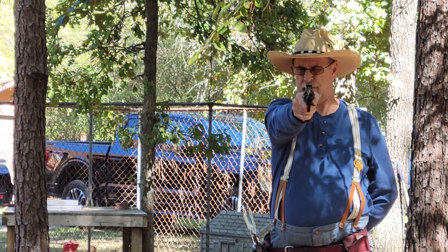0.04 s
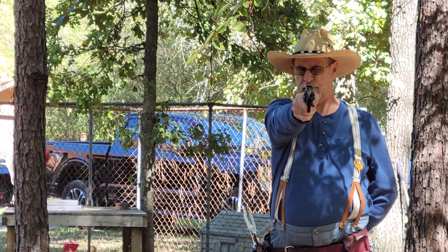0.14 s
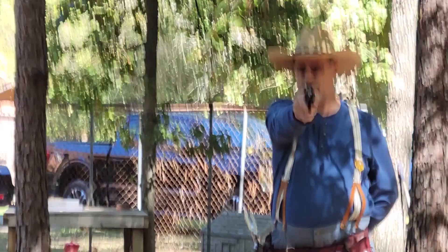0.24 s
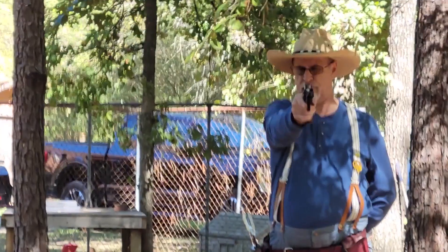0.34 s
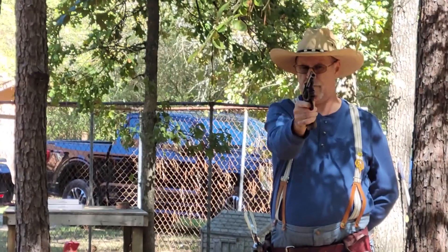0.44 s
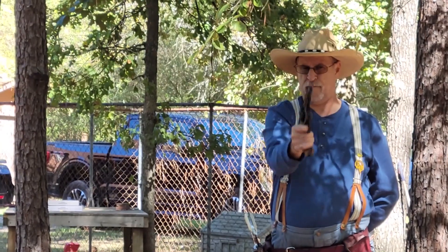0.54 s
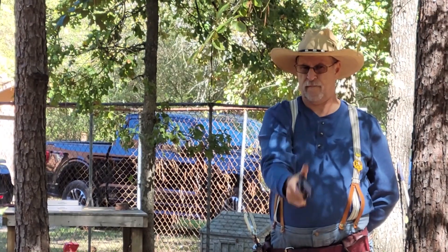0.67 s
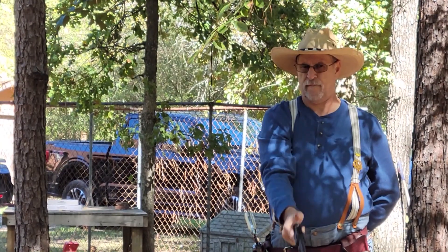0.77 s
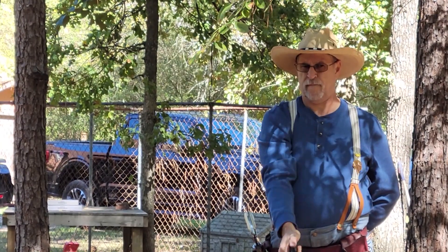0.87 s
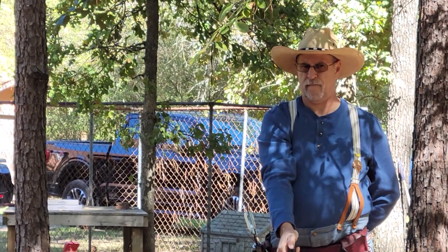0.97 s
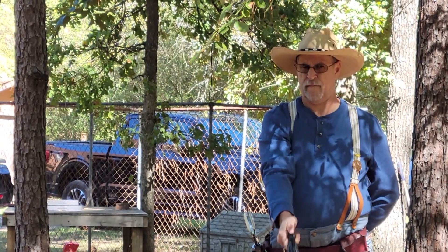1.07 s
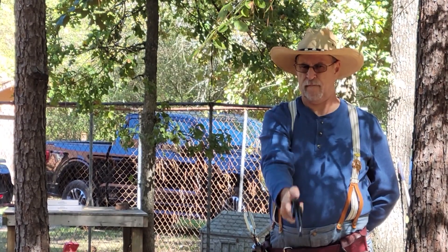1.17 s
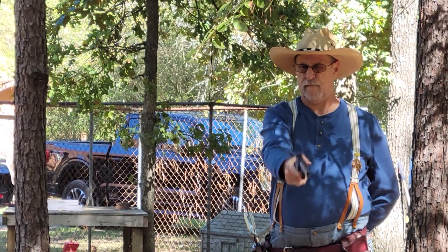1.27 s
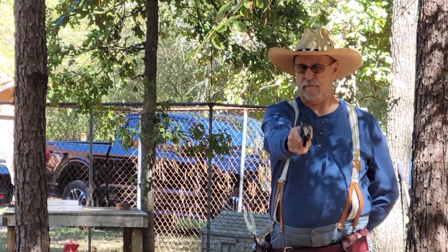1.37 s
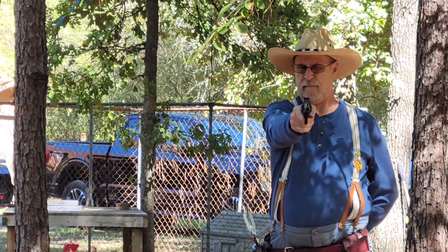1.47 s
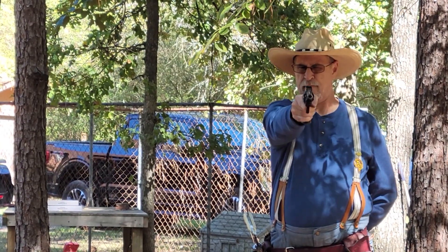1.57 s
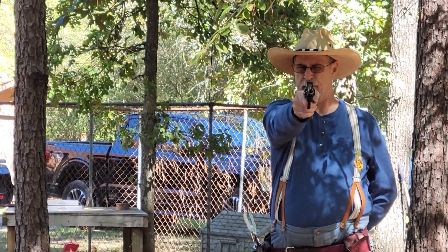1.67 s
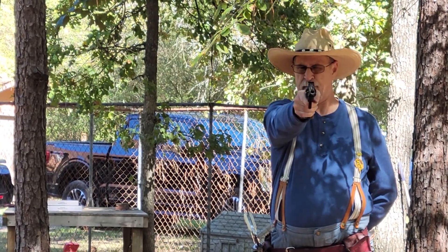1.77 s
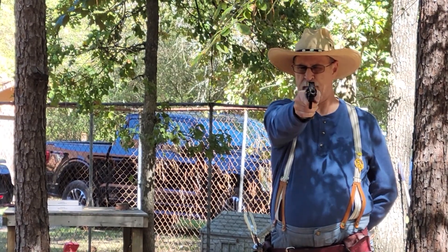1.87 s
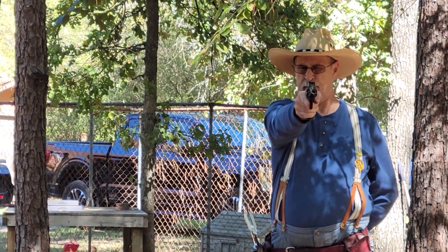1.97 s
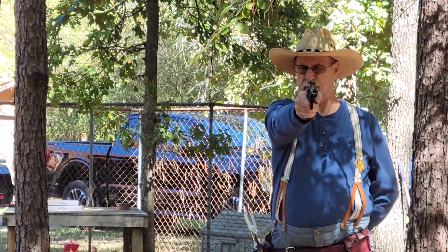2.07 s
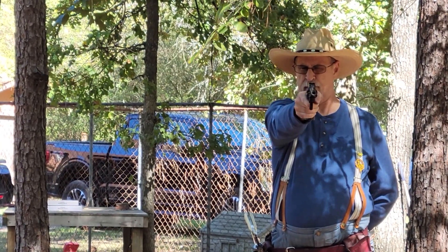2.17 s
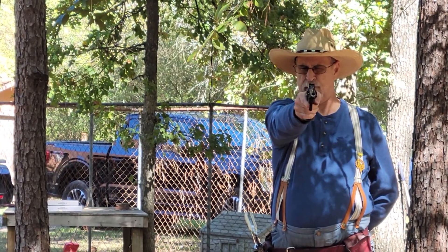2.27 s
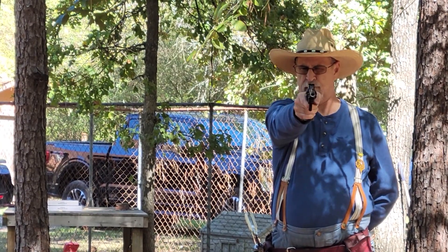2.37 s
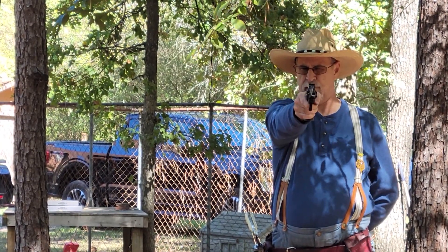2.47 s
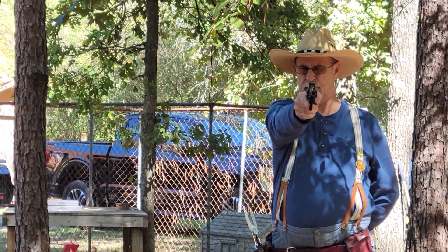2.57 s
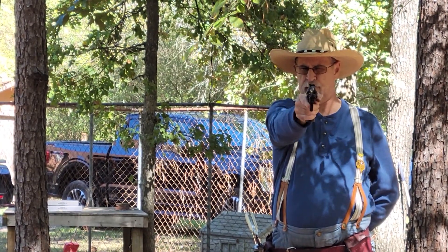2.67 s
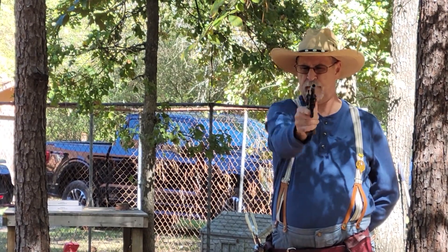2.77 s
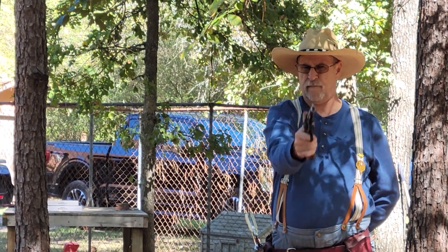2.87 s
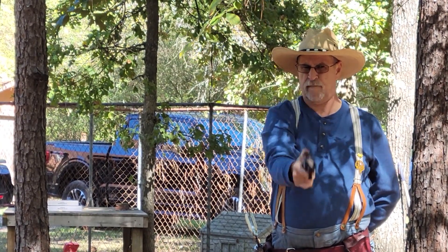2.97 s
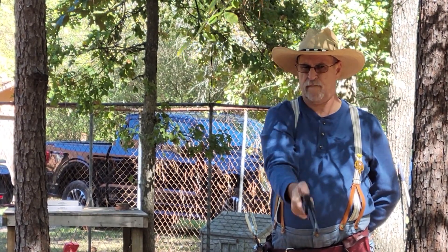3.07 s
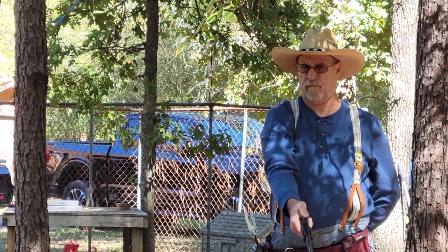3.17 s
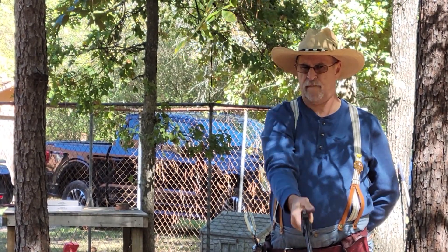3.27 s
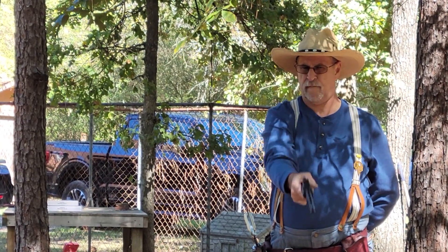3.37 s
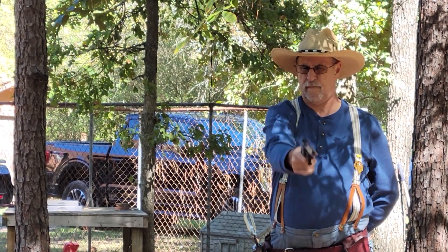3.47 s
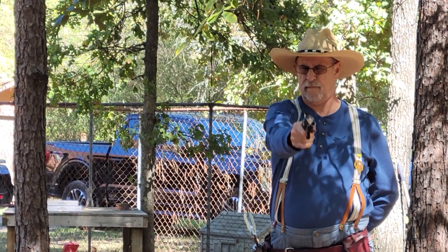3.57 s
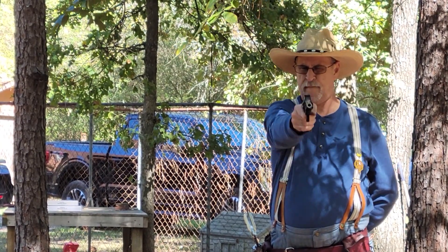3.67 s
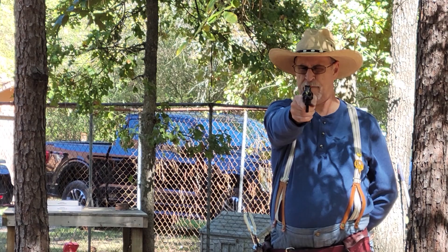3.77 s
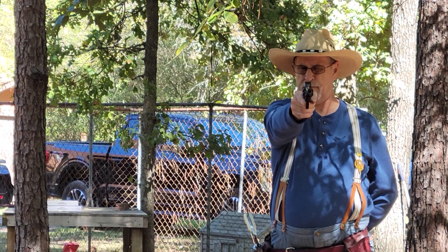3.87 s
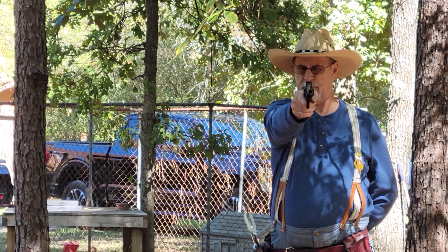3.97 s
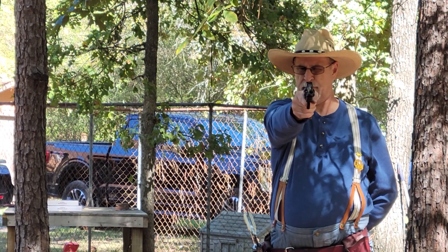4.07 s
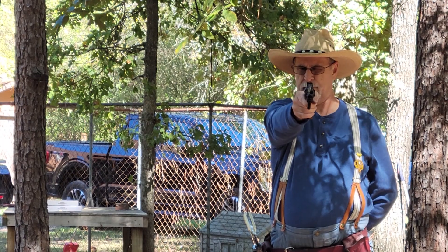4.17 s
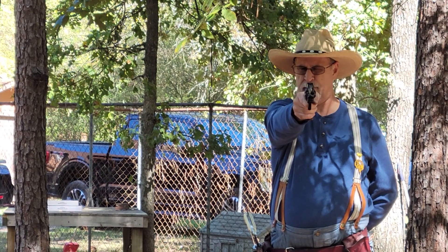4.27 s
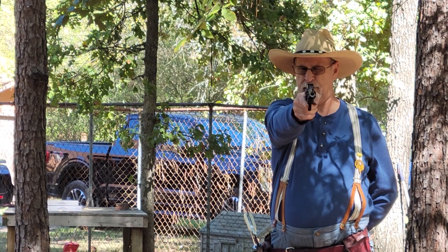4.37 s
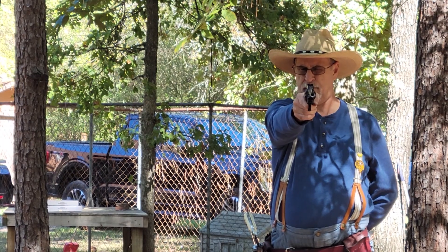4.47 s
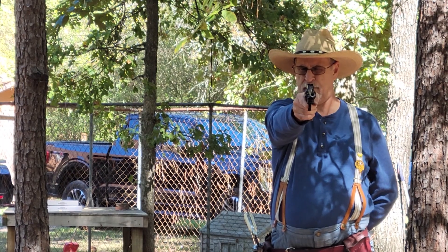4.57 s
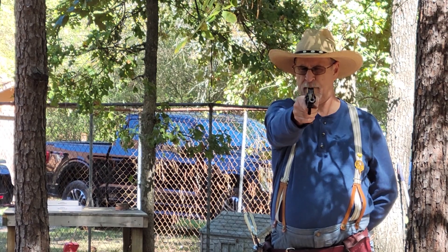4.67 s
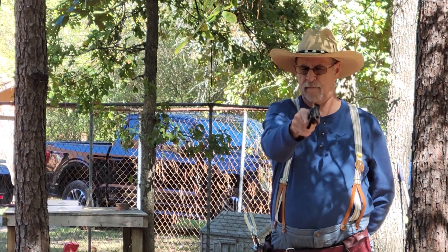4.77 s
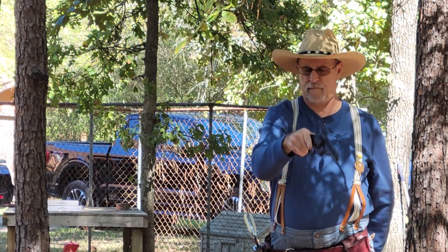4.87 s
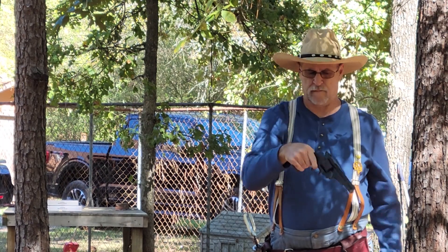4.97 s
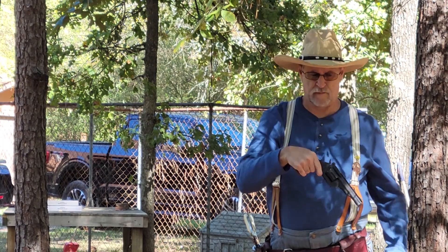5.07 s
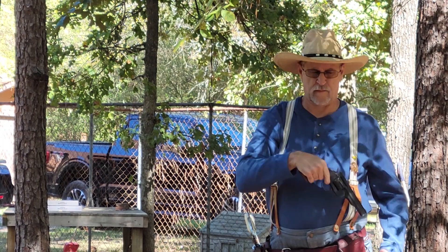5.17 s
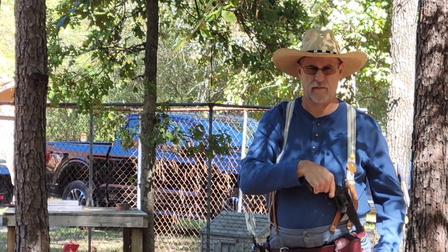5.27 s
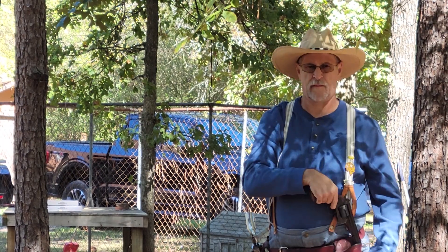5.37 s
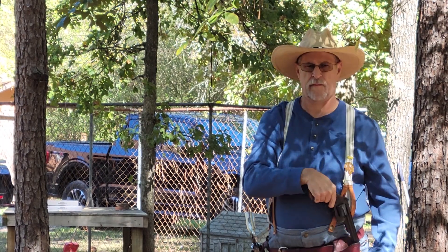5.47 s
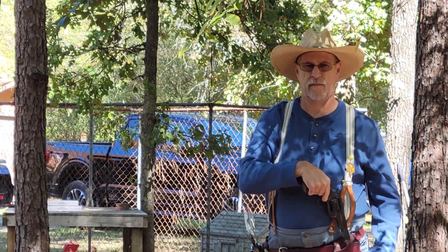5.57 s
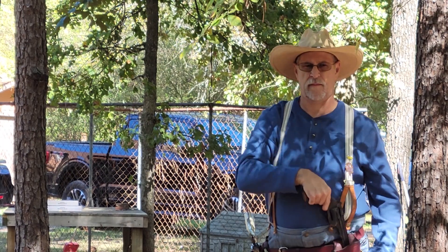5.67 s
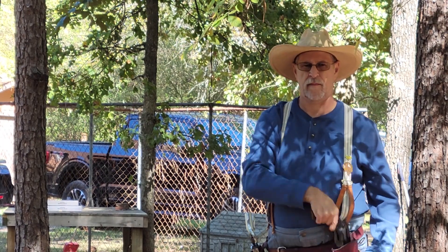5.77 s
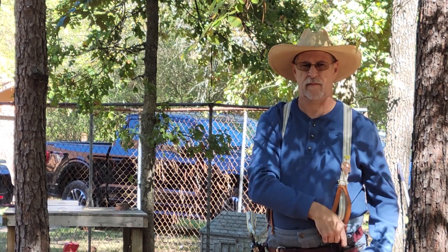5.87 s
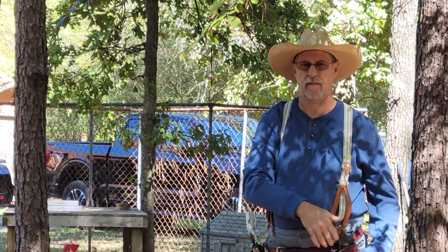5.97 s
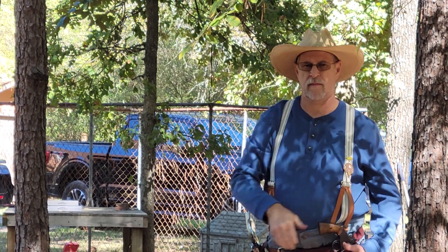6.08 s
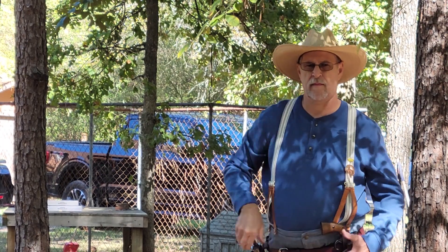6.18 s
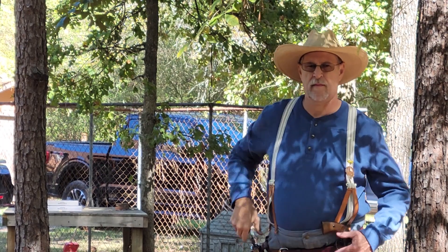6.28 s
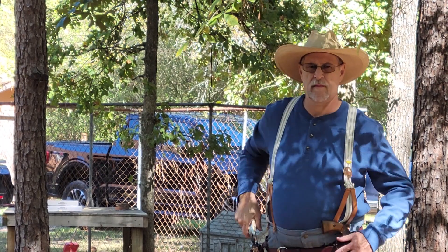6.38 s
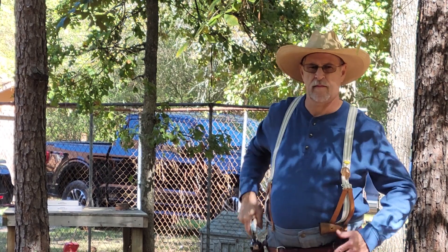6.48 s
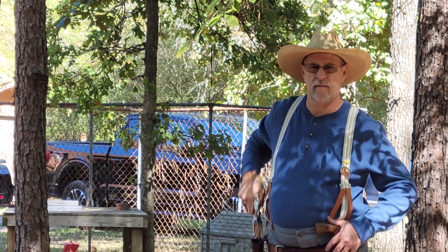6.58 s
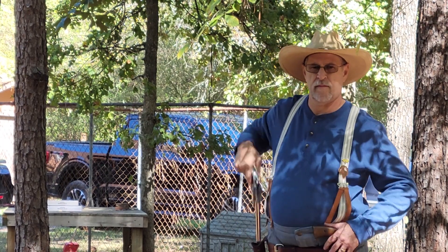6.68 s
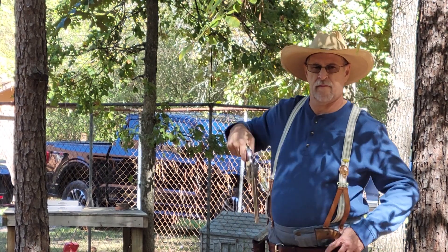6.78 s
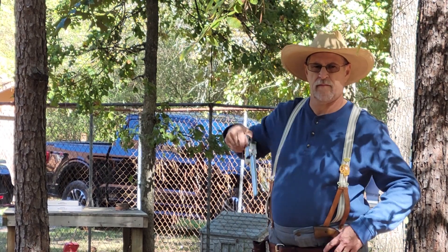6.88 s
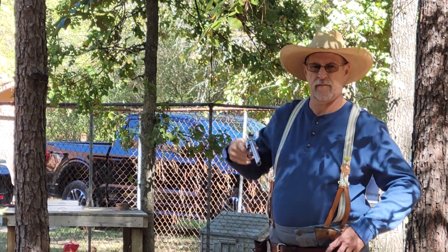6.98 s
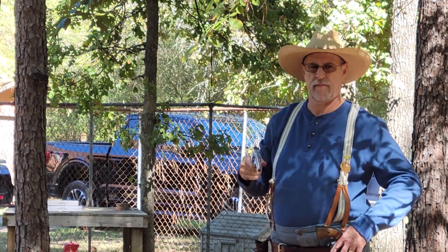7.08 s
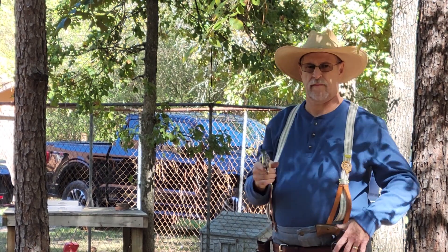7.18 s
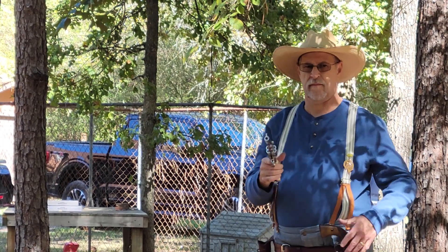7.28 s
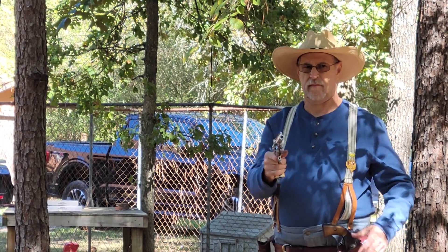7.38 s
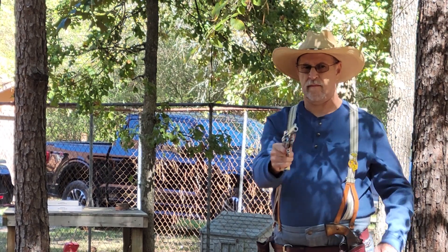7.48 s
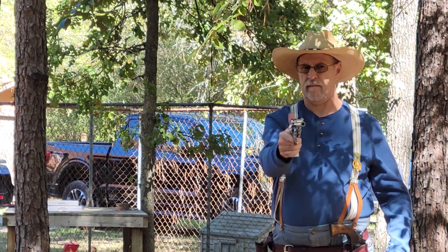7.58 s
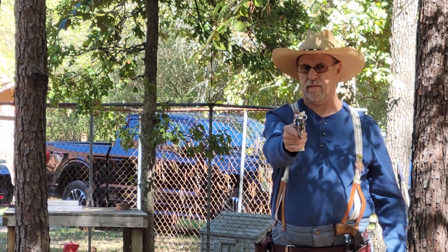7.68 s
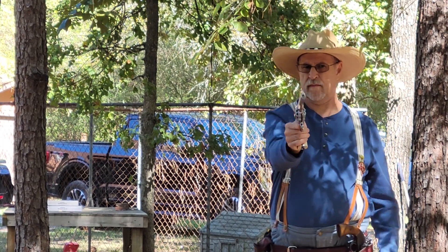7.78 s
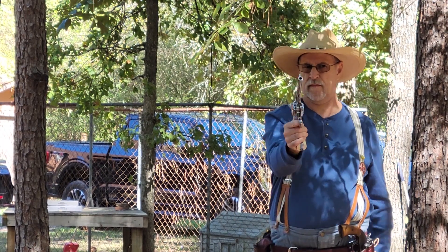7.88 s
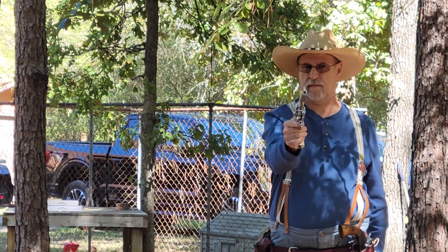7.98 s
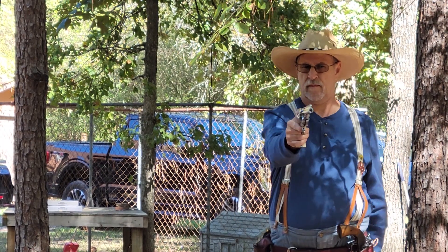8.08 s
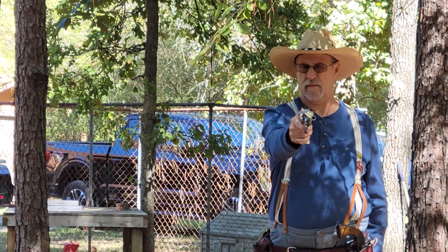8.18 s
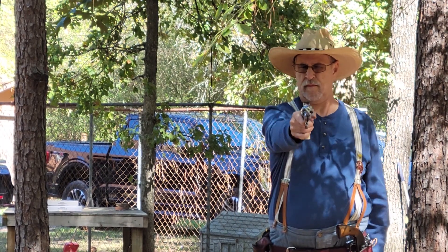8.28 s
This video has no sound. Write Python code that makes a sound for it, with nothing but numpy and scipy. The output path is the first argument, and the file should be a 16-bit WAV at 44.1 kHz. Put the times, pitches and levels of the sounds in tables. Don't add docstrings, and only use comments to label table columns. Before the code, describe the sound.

Three sharp gas revolver cracks outdoors, each followed instantly by a pellet ringing a nearby steel plate, with hammer clicks over faint traffic rumble.

```python
import sys
import numpy as np
from scipy import signal
from scipy.io import wavfile
from scipy.ndimage import uniform_filter1d, minimum_filter1d

SR = 44100
rng = np.random.default_rng(int(sys.argv[2]) if len(sys.argv) > 2 else 0)


def digitize_waveform(pressure):
    field = np.atleast_2d(pressure).T
    bounded = np.clip(field, -1, 1)
    quanta = np.round(bounded * 32767).astype(np.int16)
    wavfile.write(sys.argv[1], SR, quanta)


def volts_from_decibels(level):
    exponent = np.asarray(level, float) / 20
    return 10 ** exponent


N = 367794

# shot in seconds, pellet strike in seconds.
TIMES = [
    (.1175, .1600),
    (2.4107, 2.4576),
    (4.4400, 4.4885),
]
# shot in dB, strike clatter in dB, ducking at the shot in dB, at the strike in dB.
SHOTS = [
    (16, -11, 26, 10),
    (16, -11, 22.5, 12.5),
    (16, -4, 23.5, 13.5),
]
# frequency in Hz, level in dB per Hz.
WOODS = [(290, -46.5), (500, -15), (1080, -8), (3390, -8.5), (4870, -1), (5880, -8.5), (6610, 0),
         (9220, -11), (13300, -11), (16000, -14)]
# frequency in Hz, level in dB per Hz.
LATCH = [(1060, -38), (1800, -3.5), (2970, -20.5), (3200, -6.5), (4720, -10.5), (7300, -5), (9370, -29),
         (14500, -18.5), (16500, -36.5)]
REBOUND_S, REBOUND_DB, REBOUND_DUCK_DB = .189, -17.5, 10.6


def evened(x):
    return x / np.sqrt(np.mean(x ** 2) + 1e-20)


def read(points, hz):
    f, value = np.transpose(points)
    return np.interp(np.log(hz + 1), np.log(f + 1), value)


def add(mix, s, sound):
    part = mix[:, round(s * SR):][:, :sound.shape[1]]
    part += sound[:, :part.shape[1]]


def coloured(x, points):
    gain_db = np.maximum(read(points, abs(np.fft.fftfreq(2048, 1 / SR))), -80)
    gain = np.log(volts_from_decibels(gain_db))
    taps = np.fft.ifft(np.exp(gain - 1j * signal.hilbert(gain).imag)).real[:1024]
    return signal.fftconvolve(x, taps[None] / np.linalg.norm(taps), axes=1)[:, :x.shape[1]]


def pair(length, same):
    a, b = rng.standard_normal((2, length))
    same = np.clip(same, 0, 1)
    return np.array([a, same * a + np.sqrt(1 - same ** 2) * b])


def blotches(shape, bins, frames):
    patches = uniform_filter1d(rng.standard_normal(shape), size=bins, axis=0)
    return evened(uniform_filter1d(patches, size=frames, axis=1))


def burst(ms, same):
    t = np.arange(6000) / SR
    x = pair(len(t), same) * np.exp(-t * 1000 / ms) * np.minimum(t * 9000, 1)
    return 2 * x / abs(x).max()


def tail(points, stretch):
    # frequency in Hz, time to fall by 60 dB in seconds.
    woods_t60 = [(200, 0.57), (1000, 0.33), (3000, 0.33), (7500, 0.32), (9000, 0.26), (16000, 0.21)]
    hz, t, z = signal.stft(pair(SR * 2 // 3, 0.58), SR, nperseg=256)
    patches = blotches(z.shape[1:], 2, 14)
    z = z * volts_from_decibels(4.84 * patches - 60 * t / (stretch * read(woods_t60, hz)[:, None]))
    return coloured(signal.istft(z, SR, nperseg=256)[1], points)


def hiss_swell(length_s):
    count = round(length_s * SR)
    return np.hanning(count) * evened(coloured(pair(count, .3), LATCH))


def yard():
    # frequency in Hz, level in dB per Hz.
    yard_colour = [(20, -38), (33, -30), (55, -13.5), (96, -6), (195, -24.5), (330, -29), (500, -27),
                   (640, -37.5), (1180, -38.5), (2500, -52.5), (4530, -70.5), (6000, -67), (7400, -59),
                   (8400, -100), (16500, -100)]
    # time in seconds, level in dB.
    rumble = [(0.0, -40.5), (0.32, -35.5), (1.79, -46.5), (2.74, -40), (4.02, -46), (4.92, -38),
              (5.34, -45.5), (8.18, -43), (8.34, -42.5)]
    # frequency in Hz, likeness from 0 to 1.
    likeness = [(30, .9), (100, .93), (200, .91), (400, .8), (1000, .6), (3000, .3), (8000, .2)]
    level_db, throb_db, slowest_hz, fastest_hz = -41, 1.64, .8, 9
    frames, hz = N // 512 + 6, np.fft.rfftfreq(2048, 1 / SR)
    a, b, c, d = rng.standard_normal((frames, 1025, 4)).T
    patches = blotches((1025, frames), 30, 25)
    t = np.arange(frames) * 512 / SR
    throb = 0
    for f in np.geomspace(slowest_hz, fastest_hz, num=24):
        throb = throb + np.sin(2 * np.pi * (f * t + rng.random())) / np.sqrt(f)
    swell_db = np.interp(t, *np.transpose(rumble)) + throb_db * evened(throb)
    low = 1 / (1 + (hz / 250) ** 2)
    same = np.clip(read(likeness, hz), 0, 1)[:, None]
    left = a + 1j * b
    right = 1.08 * (same * left + np.sqrt(1 - same ** 2) * (c + 1j * d))
    z = np.array([left, right])
    z *= volts_from_decibels(read(yard_colour, hz)[:, None] + 0.52 * patches + low[:, None] * (swell_db - swell_db.mean()))
    return volts_from_decibels(level_db) * evened(signal.istft(z, nperseg=2048, noverlap=1536)[1][:, :N])


def steel():
    # frequency in Hz, time to fall by 60 dB in seconds, level in dB after
    plate = [(467.0, 23.99, -32.5, -19.7, -19.2), (1045.0, 8.54, -52.4, -59.5, -42.6),
             (1172.9, 12.06, -37.1, -54.0, -39.2), (1480.1, 5.96, -26.9, -60.1, -43.1),
             (2740.7, 1.39, -13.9, -42.2, -19.2), (3078.8, 0.33, -31.4, -37.2, -17.4),
             (3169.8, 1.18, -18.3, -30.8, -17.3), (3485.9, 0.75, -1.8, -33.5, -20.8),
             (3869.8, 0.58, -22.7, -12.2, -22.6), (3933.7, 0.36, -14.2, -14.4, -16.6),
             (4266.7, 0.75, -12.2, -36, -38), (4334.1, 0.44, -30.4, -8.7, -9.3),
             (4712.1, 0.41, -17.9, -35.5, -13.1), (5425.4, 0.52, -29.9, -25.3, -9.1),
             (5808.6, 0.32, -17.7, -33.5, -25.3), (6108.6, 0.52, -19.1, -36.9, -22.0),
           (6573.1, 0.57, -34.2, -17.0, -19.3), (7428.6, 0.49, -27.1, -9.5, -14.5),
           (7589.3, 0.53, -24.9, -35.7, -21.4), (10529.4, 0.37, -18.3, -42.5, -16.4),
           (10813.4, 0.42, -24.0, -40.7, -13.6), (11669.6, 0.39, -18.0, -22.0, -27.4),
           (11692.0, 0.3, -10.9, -3.9, -9.8), (11957.0, 0.35, -27.9, -8.9, -8.3),
           (12205.0, 0.45, -18.2, -30.3, -32.0), (13285.3, 0.29, -25.7, -33.8, -16.4),
           (13789.1, 0.24, -9.3, -21.6, -9.6), (13911.7, 0.19, -5.6, -37.4, -2.5),
             (14918.3, 0.4, -15.3, -62.7, -18.9), (832.1, 1.44, -55.0, -33.5, -33.1),
              (1371.7, 0.95, -52.4, -45.1, -45.2), (1990.8, 1.33, -31.9, -44.8, -34.4),
              (2082.2, 0.59, -29.0, -53.4, -49.9), (2799.3, 0.96, -35.7, -41.8, -26.9),
              (3819.8, 0.74, -26.4, -43.7, -40.2), (5213.1, 0.46, -38.1, -36.2, -30.9),
              (6203.5, 0.52, -22.7, -52.8, -44.9), (6276.6, 0.44, -30.1, -38.0, -30.0),
              (7124.2, 0.47, -35.6, -48.6, -28.3), (9026.3, 0.42, -29.4, -33.3, -20.5),
              (13011.6, 0.37, -23.0, -24.5, -60.6), (15214.8, 0.4, -22.1, -31.8, -34.7)]
    # left minus
    # right in dB, left's lead in radians.
    plate_ports = [(-1.4, -0.3), (5.0, -2.1), (11.6, 2.7), (5.9, -1.0), (5.3, -1.9), (-4.6, -1.8),
                   (5.9, -2.1), (2.4, -2.1), (-0.7, -0.5), (-4.6, -0.3), (-3.3, 1.2), (-4.2, 3.1),
                   (-11.0, 2.1), (-11.9, -2.8),
                   (-11.4, -1.9), (1.1, 3.0), (0.1, 2.2), (-7.9, 0.4), (-11.1, -2.7), (13.9, -0.2),
                 (18.9, -1.5), (0.3, -2.1), (10.5, -1.7), (-13.7, -2.6), (-1.7, -2.6), (2.7, 3.0),
                 (-5.6, -2.1), (16.5, -1.6),
                   (-1.0, 1.3), (-0.7, -1.2), (3.6, -0.6), (4.9, -3.0), (-6.3, -1.2), (-0.1, -1.6),
                    (-13.3, 2.0), (-0.8, 0.7), (5.1, -1.6), (5.7, -0.4), (-3.9, -1.3), (16.8, 2.9),
                    (8.8, 0.9), (18.0, 1.0)]
    # frequency in Hz, left minus right in dB, left's lead in radians.
    frame_places = [(1885, 2, -1.5), (1350, 2, -.6), (2781, 1, -1.6), (4287.9, 4, 3.1), (7773, -4, -.8),
                    (8113, 4, -.7), (8640, 3, 1.2), (9895, 12, -.5), (10900, 6, -1.2), (11300, 3, -.8),
                    (12310, -3, -1.5), (14120, 3, .8), (15720, 5, .6), (11490, 4, -1.3)]
    # time to fall by 60 dB in seconds, level in dB after strike one, two, three.
    frame_blows = [(0.24, -31, -19.5, -16.5), (.2, -34.5, -25, -28.5), (3.2, -50, -52, -45),
                   (1.1, -34.5, -22, -24.5), (.35, -47.5, -26.5, -42.5), (0.28, -19.5, -37, -45.5),
                   (.25, -39, -25, -42.5), (.45, -31.5, -44.5, -34.5), (0.19, -40, -25, -44),
                   (.3, -37, -34, -43.5), (0.25, -32, -14, -37), (.28, -38.5, -23, -42.5),
                   (.4, -36, -42.5, -44.5), (.4, -41, -28, -47)]
    # frequency in Hz, level in dB.
    earlier = [(467, -32), (1045, -49.5), (1172.9, -48.5), (1480.1, -60)]
    extra_db = [0, 5.5, -1, 4]
    shed_s, shed_above_hz = .03, 10000
    out = np.zeros((2, N))
    starts = [0] + [strike for _, strike in TIMES]
    ends = starts[1:] + [N / SR]
    modes = plate + [(place[0], *blow) for place, blow in zip(frame_places, frame_blows)]
    ports = plate_ports + [place[1:] for place in frame_places]
    for (hz, t60, *blows_db), (left_db, lead) in zip(modes, ports):
        before_db = max([db for f, db in earlier if abs(f - hz) < 30], default=-150)
        left = volts_from_decibels(np.clip(left_db, -20, 20))
        for start, end, db, shed_db in zip(starts, ends, [before_db, *blows_db], extra_db):
            t = np.arange(0, min(end - start, (db + 102) * t60 / 60), 1 / SR)
            turn = 2 * np.pi * (hz * t + rng.random())
            sides = np.sqrt(2 / (1 + left ** 2)) * np.array([left * np.sin(turn + lead), np.sin(turn)])
            rise = 1 - (start > 0) * np.exp(-t / (0.013 / (1 + (hz / 6000) ** 4)))
            early_db = shed_db * (hz > shed_above_hz) * np.exp(-t / shed_s)
            add(out, start, volts_from_decibels(db + early_db - 60 * t / t60) * rise * sides)
    return out


def hiss_before_cracks():
    out, t = np.zeros((2, N)), np.arange(-1760, 0) / SR
    swell = volts_from_decibels(-29 + 840 * t) * np.minimum(1, (t - t[0]) / 0.0078)
    for shot, _ in TIMES:
        add(out, shot + t[0], swell * coloured(pair(len(t), .4), WOODS))
    return out


def revolver():
    # delay in seconds, level in dB, length in milliseconds.
    echoes = [
        (0, 2, 1.0),
        (.0018, -7, 1.2),
        (.008, -11, 1.3),
        (.0119, -5, .4),
        (.0137, -10, .5),
        (.019, -21, 1.5),
        (.0238, -13, 1.0),
        (.031, -20, 2.5),
    ]
    # frequency in Hz, level in dB per Hz.
    crack = [(290, -27), (500, -4), (2230, -8.5), (3200, -5.5), (3650, -8), (4470, -2), (7210, -5),
             (9490, -23), (12500, -15), (16000, -24)]
    out, t = np.zeros((2, N)), np.arange(6000) / SR
    front = 2.1 * (np.arange(len(t)) == 6) * np.ones((2, 1))
    push = (1 - t / 0.0009) * np.exp(-t / 0.00089) * np.minimum(t * 1500, 1) * np.ones((2, 1))
    for (shot, strike), (shot_db, clatter_db, _, _) in zip(TIMES, SHOTS):
        for delay, db, ms in echoes:
            snap = coloured(.8 * burst(ms, 0.51) + front / np.sqrt(ms), crack)
            add(out, shot + delay, volts_from_decibels(shot_db + db) * (snap + volts_from_decibels(-27.5) * push))
        add(out, shot + echoes[3][0], volts_from_decibels(shot_db - 18.0) * push)
        add(out, shot + .001, volts_from_decibels(shot_db - 18.5) * tail(WOODS, 0.57))
        add(out, shot + .001, volts_from_decibels(shot_db - 39.5) * tail(WOODS, 1.7))
        add(out, strike, volts_from_decibels(clatter_db) * tail(WOODS, 0.23))
    add(out, REBOUND_S, volts_from_decibels(REBOUND_DB) * coloured(burst(5.6, .5), crack))
    return out


def clicks():
    # time in seconds, peak in dB, pitch in Hz, brightness in dB.
    hammer = [(0.5744, -64, 6110, -20), (0.637, -56, 7200, -5.5), (0.648, -63, 7000, -6),
              (0.6914, -66, 5800, -11), (0.805, -57, 7270, -9), (0.8144, -57, 6000, -11),
              (0.8744, -56, 6110, -17), (1.0088, -30.5, 5630, -10), (2.9966, -38, 7430, -3),
              (3.0705, -39, 5370, -25), (3.077, -28, 6900, -17), (8.1024, -27.5, 7520, -21)]
    # time in seconds, peak in dB, pitch in Hz.
    holster = [(3.2582, -50.5, 4900), (5.33, -66, 4620), (5.8194, -70, 4570), (5.8444, -67, 6350),
               (6.079, -71.5, 4680), (6.3254, -55.5, 7340), (7.01, -54, 6800), (8.0183, -50.5, 6300)]
    # time in seconds, peak in dB, pitch in Hz.
    pings = [
        (2.5112, -25, 5220),
        (2.623, -33, 5420),
    ]
    # time in seconds, peak in dB, pitch in Hz.
    clinks = [(1.007, -38.5, 4300), (6.29, -60.5, 3300), (7.008, -59, 5070), (7.01, -63, 5920),
              (8.102, -46, 3300), (8.103, -44, 5020)]
    hammer_left_db, holster_left_db, holster_bright_db, rattle_ms = -3, -6, -32.5, 5.2
    thud_db, thud_hz, thud_s = -5, 122, 0.012
    halo_db, halo_s = -28.5, .06
    out, t = np.zeros((2, N)), np.arange(6000) / SR
    treble = signal.butter(4, 9200, "high", fs=SR, output="sos")
    parts = [(*row, hammer_left_db) for row in hammer]
    parts += [(*row, holster_bright_db, holster_left_db) for row in holster]
    for s, db, hz, bright_db, left_db in parts:
        ring = 0.39 * np.sin(2 * np.pi * hz * t) * np.exp(-t / 0.0042) * np.minimum(t * 900, 1)
        tick = 0.54 * burst(1.7, 0.79)
        rattle = 0.32 * np.minimum(t * 250, 1) * burst(rattle_ms, 0.3)
        scatter = 0.088 * burst(24, .2) + .03 * burst(55, .2)
        snap = coloured(tick + rattle + scatter, LATCH)
        snap = snap + (volts_from_decibels(bright_db + 18.5) - 1) * signal.sosfiltfilt(treble, snap) + ring
        add(out, s - .001, volts_from_decibels(db + 2) * volts_from_decibels([[left_db / 2], [-left_db / 2]]) * snap)
        add(out, s - .3 * halo_s, volts_from_decibels(db + halo_db) * hiss_swell(halo_s))
    add(out, 5.77, volts_from_decibels(-74.5) * hiss_swell(.12))
    thud = np.sin(2 * np.pi * thud_hz * t) * t / thud_s * np.exp(1 - t / thud_s) * np.ones((2, 1))
    for s, db, *_ in hammer[-2:]:
        add(out, s, volts_from_decibels(db + thud_db) * thud)
    for s, db, hz in pings + clinks:
        ring = np.sin(2 * np.pi * hz * t) * np.exp(-t / 0.0056) * np.minimum(t * 500, 1)
        add(out, s, volts_from_decibels(db) * ring * np.ones((2, 1)))
    return out


def scene():
    return yard() + steel() + revolver() + clicks()


def thinned_treble(x):
    hz, _, z = signal.stft(x, SR, nperseg=1024)
    hz = hz[:, None]
    size = uniform_filter1d(abs(z), size=3, axis=1) * (hz > 1900)
    loudest = (size * (hz > 7000)).max(axis=1, keepdims=True)
    faint = (size < volts_from_decibels(-36) * loudest) & (hz > 7900)
    near = -minimum_filter1d(-size, size=31, axis=1)
    masked = (size < near * volts_from_decibels(np.where(hz > 7900, -21, -38))) & (hz > 1900)
    return signal.istft(z * ~(faint | masked), SR, nperseg=1024)[1][:, :N]


def band_limit(x):
    return signal.sosfilt(signal.butter(12, 16990, fs=SR, output="sos"), x)


def record(dry):
    t, duck_db = np.arange(N) / SR, np.zeros(N)
    drops = [(REBOUND_S, REBOUND_DUCK_DB)]
    for (shot, strike), (_, _, shot_duck_db, strike_duck_db) in zip(TIMES, SHOTS):
        drops += [(shot, shot_duck_db), (strike, strike_duck_db)]
    for s, db in drops:
        left_db = np.maximum(db - 280 * (t - s), 0) * np.clip((t - s + .0045) / .003, 0, 1)
        duck_db = np.maximum(duck_db, left_db)
    duck_db = uniform_filter1d(duck_db, 120)
    bass = signal.sosfiltfilt(signal.butter(2, 170, fs=SR, output="sos"), dry)
    treble = signal.sosfiltfilt(signal.butter(4, 10500, "high", fs=SR, output="sos"), dry)
    middle = dry - bass - treble
    mixed = middle / volts_from_decibels(duck_db) + treble / volts_from_decibels(0.86 * duck_db) + bass / volts_from_decibels(0.1 * duck_db)
    mixed = np.tanh((mixed + hiss_before_cracks()) * 1.131) / 1.075
    edge = signal.firwin(255, 16100, window=("kaiser", 8), fs=SR)[None]
    mixed = signal.oaconvolve(mixed, edge, "same")
    return band_limit(thinned_treble(mixed))


dry = scene()
out = record(dry)
digitize_waveform(out)
```